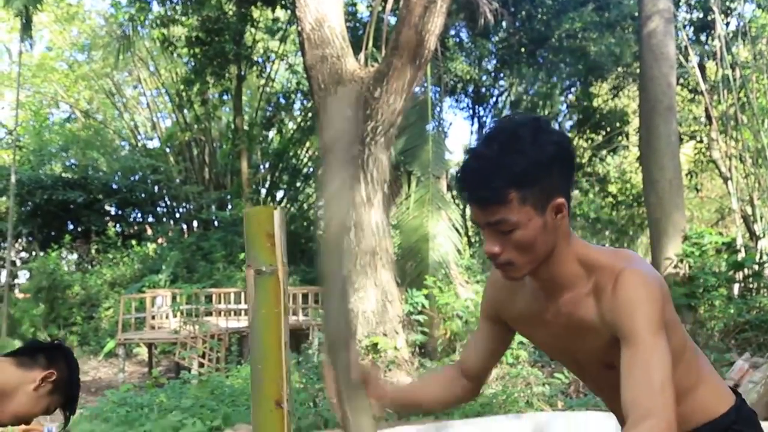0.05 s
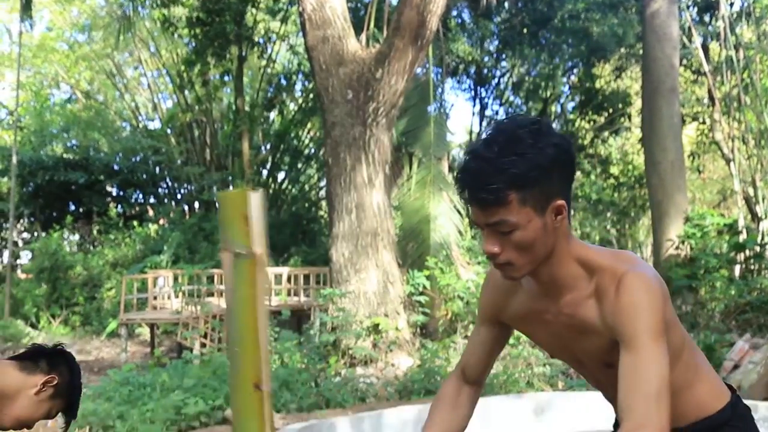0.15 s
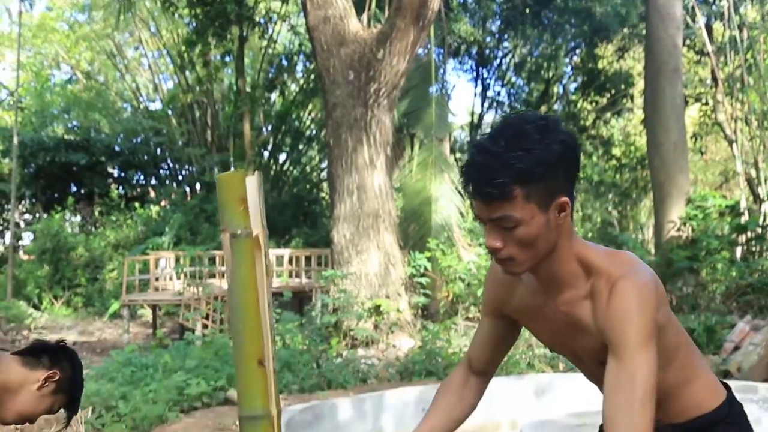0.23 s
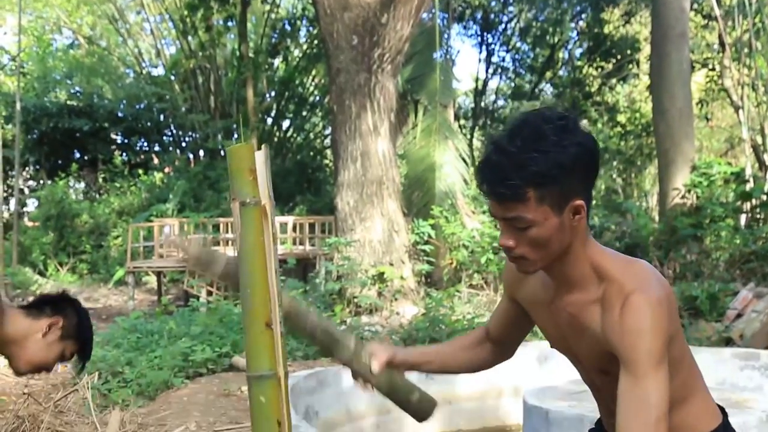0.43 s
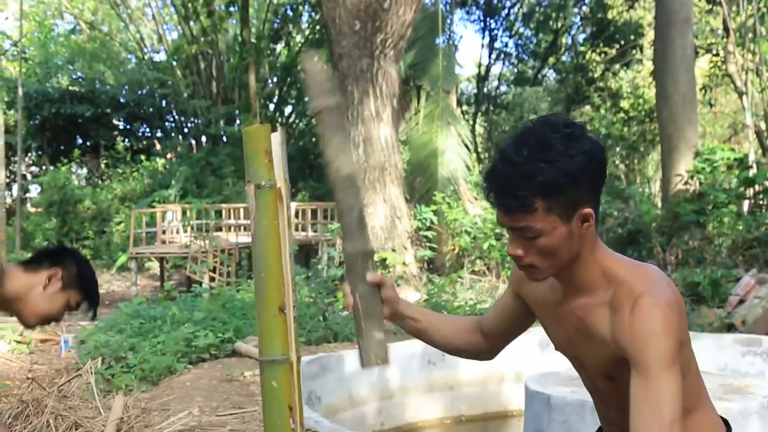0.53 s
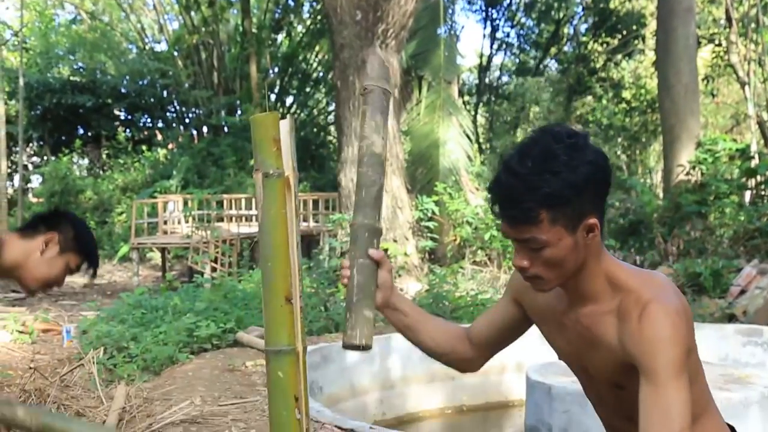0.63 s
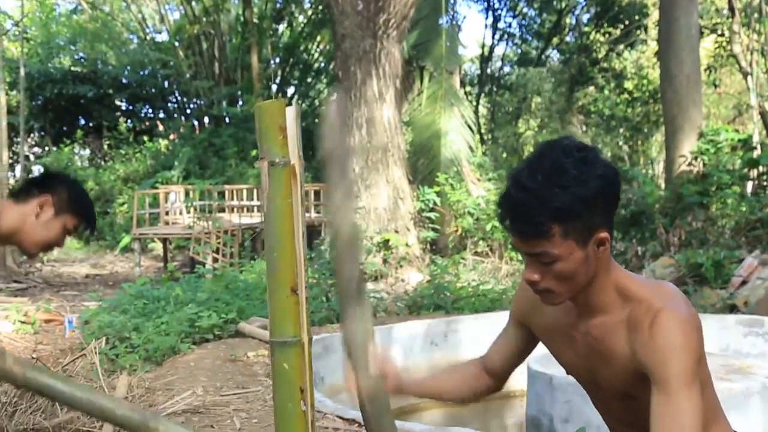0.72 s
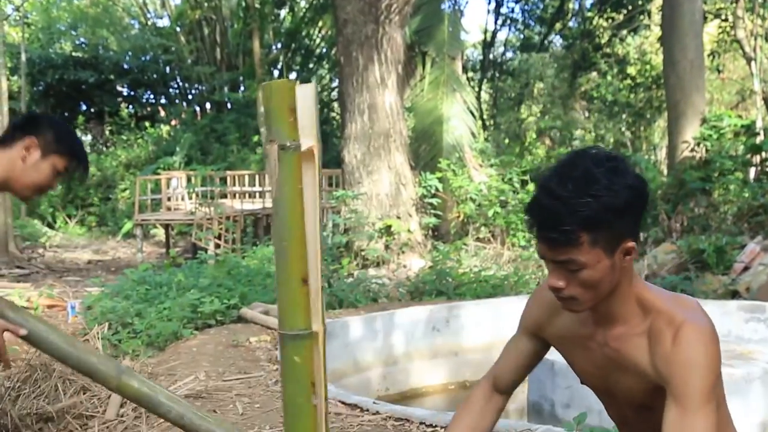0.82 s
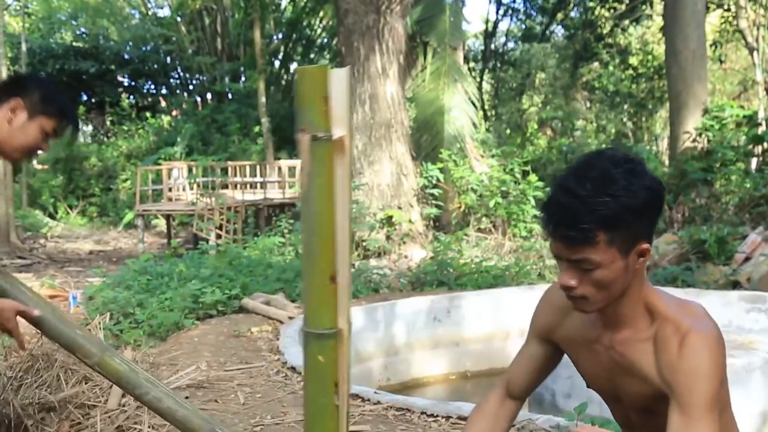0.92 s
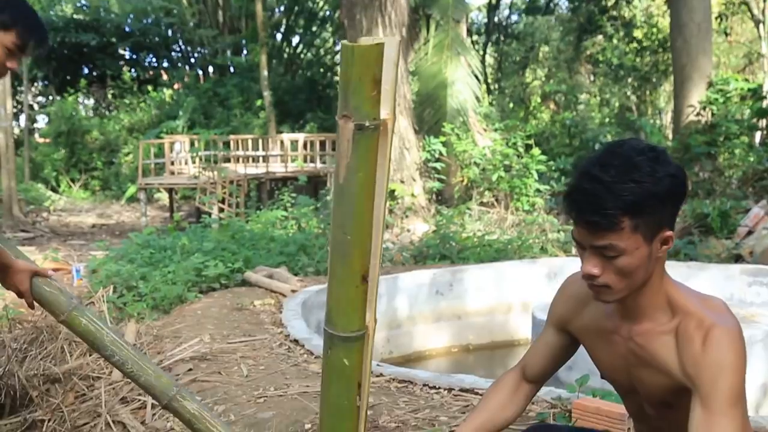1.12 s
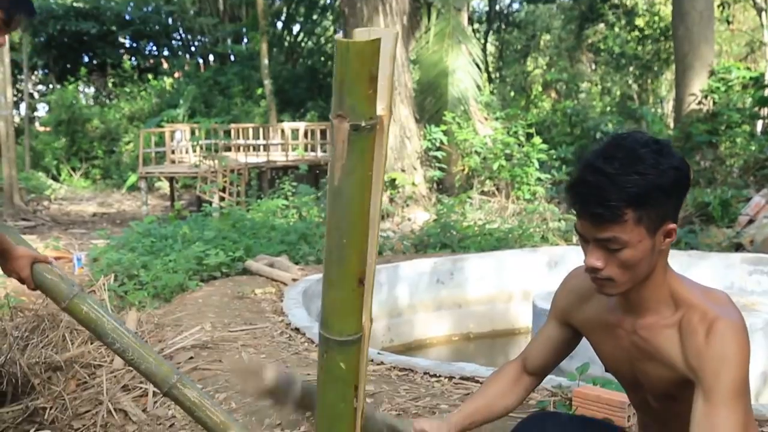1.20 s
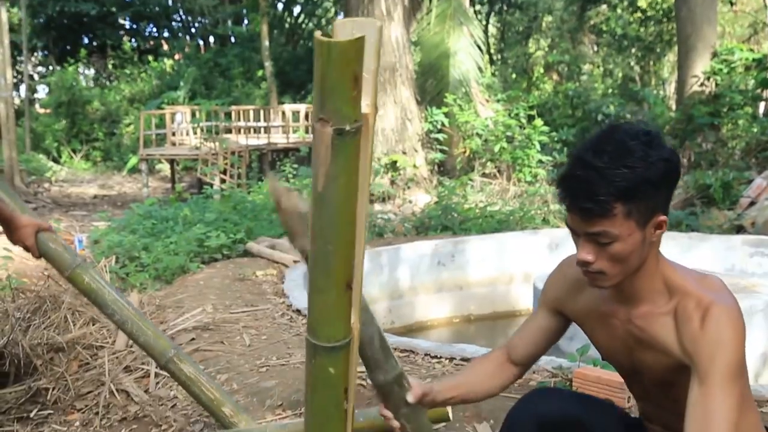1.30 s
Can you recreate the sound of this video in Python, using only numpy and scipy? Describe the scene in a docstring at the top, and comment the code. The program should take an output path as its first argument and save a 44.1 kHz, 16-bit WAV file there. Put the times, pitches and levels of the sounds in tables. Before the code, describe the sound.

Two sharp, hollow whacks of wood on bamboo outdoors, over a low distant drone.

```python
"""A grove, the microphone close to an upright, half-split bamboo pole, a low drone in the distance.
The split creaks as a wedged wooden stick slips in it. A whack rings the pole and its halves clap together.
After some light knocks and dry ticks a second stick strikes, and the halves clap again.
Each blow overloads the recorder, whose gain control ducks and recovers while the trees answer."""
import sys
import numpy as np
from scipy import signal
from scipy.fft import rfft, irfft, next_fast_len
from scipy.io import wavfile
from scipy.ndimage import minimum_filter1d, map_coordinates

SR = 44100
rng = np.random.default_rng(int(sys.argv[2]) if len(sys.argv) > 2 else 0)


def transcribe(u):
    """Save the signal u as a 16-bit wav file named by the first command-line argument.

    u: samples, shape (n,) or (channels, n), limited to [-1, 1]; the rate is SR.
    q: integer samples, one column per channel.
    """
    v = np.clip(np.atleast_2d(u).T, -1, 1)
    q = np.round(v * 32767).astype(np.int16)
    wavfile.write(sys.argv[1], SR, q)


N = 59535
RING_ATTACK_S, CRACK_ATTACK_S = 0.00059, 0.00028


def stroke(contacts, modes, scatter_db=2.5):
    """Each contact rings the pole's modes and cracks its fibres, with its own level and brightness."""
    # Spectrum of the cracking fibres. Each row: frequency in Hz, relative level in dB.
    crack = [(60, -34), (200, -7.5), (500, 0), (1600, 2), (2400, -0.5), (3800, 0.5), (5500, -9),
             (9000, -11.5), (15000, -27.5)]
    out, t = np.zeros(N), clock()
    middle_hz = np.median([hz for hz, _, _ in modes])
    for start, ring_db, ring_tilt, crack_db, crack_t60, crack_tilt in contacts:
        for k, (hz, db, t60) in enumerate(modes):
            octaves_up = max(np.log2(2 * hz / middle_hz), 0)
            level_db = ring_db + db + ring_tilt * octaves_up + scatter_db * rng.standard_normal()
            ring = fade(start, RING_ATTACK_S, t60) * np.sin(2 * np.pi * hz * (t - start))
            out += (-1) ** k * amp(level_db) * ring
        colour = [(hz, db + crack_tilt * np.log2(hz / middle_hz)) for hz, db in crack]
        out += amp(crack_db) * fade(start, CRACK_ATTACK_S, crack_t60) * noise(colour)
    return out


def first_stick():
    """The first stick whacks the pole and the split halves clap together."""
    # The blow, then the claps. Each row: start in seconds, ring level in dB, ring tilt in dB per octave,
    # crack level in dB, crack t60 in seconds, crack tilt in dB per octave.
    contacts = [(.2271, 12.5, 1, 12, 0.037, 0), (.2449, -20, 5, 5, 0.053, -0.5),
                (.2575, 1, -8.5, -6.5, 0.024, -6.5), (.2742, -8, -4, -9, 0.044, 7.5)]
    # The pole's modes under this stick. Each row: frequency in Hz, relative level in dB, t60 in seconds.
    modes = [(224, -14, 0.027), (442, -8.5, .06), (494, -19.5, 0.027), (600, -10.5, 0.08),
             (893, -24, 0.056), (1002, 2, 0.048), (1398, -15, 0.068), (1556, -6.5, 0.035),
             (1668, -11.5, 0.079), (1840, -7, 0.047), (2320, -35, 0.034), (3170, 0, 0.023),
             (3437, -7.5, 0.047), (3890, -6.5, 0.045), (4205, -15.5, 0.038)]
    return stroke(contacts, modes)


def second_stick():
    """The second stick draws a different ring from the same pole."""
    # A faint touch, the blow and two claps, then the modes they ring. Columns as for the first stick.
    contacts = [(.8655, -21.5, -4.5, -24, 0.099, -2.6), (.8812, 10.5, 0.5, 9, 0.033, 0.53),
                (.9052, 0, -1, -8.5, 0.022, -1), (.927, -3.5, -0.5, -4, 0.015, 1)]
    modes = [(208, -16.5, 0.027), (317, -18, 0.08), (600, -7.5, 0.044), (803, -8, 0.091), (905, 2.5, 0.036),
             (1027, -3.5, 0.051), (1109, -8.5, 0.088), (1316, -1, 0.045), (1557, -8, 0.035),
             (1946, -5.5, 0.033), (2500, -19, 0.045), (3266, -15, .04), (3813, -27, 0.034),
             (4173, -12, 0.061)]
    return stroke(contacts, modes)


def creak(count=80, slips_per_s=116, gap_scatter=0.2, spread_db=1.5):
    """The wedged stick slips unevenly in the split; each slip rings the tube and rasps the fibres."""
    # Course of the creak. Each row: time in seconds, relative level in dB.
    contour = [(0, -36.5), (.04, -35), (.1, -34.5), (.135, -36), (.165, -43.5), (0.176, -30.5), (.195, -32),
               (0.227, -29), (.235, -67)]
    # Resonances of the tube. Each row: centre in Hz, width in Hz, relative level in dB.
    resonances = [(954, 26, -1.5), (1398, 34, 11), (1482, 43, 5), (1874, 50, 0), (2320, 200, -3.5),
                  (3364, 30, 3), (4020, 440, -13)]
    # Spectrum of the rasp. Each row: frequency in Hz, relative level in dB.
    fibre = [(100, -7.5), (450, 3.5), (1200, 1), (2500, 1), (4500, -10), (5500, -15.5), (8000, -11.5),
             (10500, -23), (12000, -26), (15000, -44)]

    def tube(hz):
        return sum(amp(db) * 1j * hz * width / (centre ** 2 - hz ** 2 + 1j * hz * width)
                   / (1 + 1j * hz / (2 * centre)) for centre, width, db in resonances)

    gaps, sizes = rng.standard_normal((2, count))
    times = np.cumsum(np.exp(gap_scatter * gaps)) / slips_per_s
    slips = np.bincount((times * SR).astype(int), amp(spread_db * sizes), N)[:N]
    body = filtered(slips, tube)
    rasp = signal.fftconvolve(slips, fade(0, CRACK_ATTACK_S, t60=0.05))[:N] * noise(fibre)
    level = amp(np.interp(clock(), *np.transpose(contour), right=-120))
    slipping_share = times[-1] * SR / N
    return amp(-1.5) * level * np.sqrt(slipping_share) * (unit(body) + unit(rasp))


def taps(rows, attack_s=0.0014):
    """Small dead contacts: a short burst of noise in one band each."""
    out = np.zeros(N)
    for start, db, centre, octaves, t60 in rows:
        band = lambda hz: 1 / (1 + (np.log2((hz + 1) / centre) / octaves) ** 2) ** 1.44
        out += amp(db) * fade(start, attack_s, t60) * unit(filtered(rng.standard_normal(N), band))
    return out * amp(6.5)


def knocks_and_ticks():
    """The sticks knock lightly as they are handled; fibre and leaf give dry ticks."""
    # Each row: start in seconds, relative level in dB, centre in Hz, width in octaves, t60 in seconds.
    knocks = [(.479, -28.5, 1250, 0.66, 0.094), (.484, -37.5, 454, 1, 0.17),
              (.549, -40.5, 322, 0.29, 0.086), (.8455, -33, 1490, 0.18, 0.11),
              (1.016, -21.5, 1140, 0.38, 0.065), (1.03, -34, 484, 0.13, 0.16),
              (1.2175, -32, 880, 0.83, 0.037)]
    ticks = [(.6255, -31, 5330, 0.48, 0.02), (.67, -46.5, 5260, 0.72, 0.043),
             (.752, -46.5, 6000, 1.2, 0.06), (.823, -31.5, 2400, 1.25, 0.047),
             (1.255, -46, 8500, 0.59, 0.013)]
    return taps(knocks) + taps(ticks)


def grove(x, build_s=0.084):
    """The ground nearby scatters the sound; trunks and leaves return it as a diffuse, coloured wash."""
    # Decay among the trees. Each row: frequency in Hz, t60 in seconds.
    decay_times = [(200, .5), (1000, 0.3831), (3500, 0.44), (7000, 0.49), (13000, 0.27)]
    # Colour of the wash. Each row: frequency in Hz, relative level in dB.
    colour = [(100, -18), (450, -7.5), (620, -4), (780, -4), (980, 6.5), (1200, -3.5), (1450, 0.5),
              (1900, -3.5), (2500, -3), (3150, 1.5), (4200, -2.5), (5400, -13), (7200, -14), (10500, -18),
              (15000, -22)]
    hz, t, spectra = signal.stft(x, SR, nperseg=256)
    t60 = along(decay_times, hz)[:, None]
    tail = (np.exp(-np.log(1000) * t / t60) * (1 - np.exp(-t / build_s))) ** 2
    energy = np.sum(np.abs(spectra) ** 2, axis=0)[None]
    power = signal.fftconvolve(energy, tail / tail.sum(axis=1, keepdims=True), axes=1)[:, :len(t)]
    wash_spectra = signal.stft(noise(colour), SR, nperseg=256)[2] * np.sqrt(np.abs(power))
    wash = signal.istft(wash_spectra, SR, nperseg=256)[1][:N]
    ground = rng.standard_normal(N) * fade(0, attack=0.0055, t60=0.22)
    scatter = signal.fftconvolve(x, ground / np.linalg.norm(ground))[:N]
    return amp(-15) * wash + amp(-22) * scatter


def background(drone_hz=148.8, wander_hz=2.9, drone_sway_db=2, air_sway_db=0.5):
    """Leafy air, low rumble and a wavering drone like a far engine."""
    # Spectra of the air and the rumble. Each row: frequency in Hz, relative level in dB.
    air = [(100, -4), (300, 2), (450, -3), (750, 3.5), (950, 7.5), (1150, 2.5), (1400, 4), (2000, -3),
           (3400, 2), (4400, -3.5), (5500, -13.5), (9500, -16.5), (13000, -23.5), (15500, -25)]
    rumble = [(20, -30), (45, -19), (75, -9.5), (115, -5), (160, -3.5), (210, -14), (320, -14.5),
              (700, -93)]
    pitch = drone_hz + wander_hz * wobble(24.2)
    drone = unit(amp(drone_sway_db * wobble(37)) * np.sin(2 * np.pi * np.cumsum(pitch) / SR))
    air_level = amp(-41 + air_sway_db * wobble(10.67))
    return air_level * noise(air) + amp(-44.5) * noise(rumble) + amp(-45.5) * drone


def amp(db):
    """Decibels to gain."""
    return 10 ** (np.asarray(db) / 20)


def unit(x):
    """Scale to rms 1."""
    return x / np.sqrt(np.mean(x ** 2) + 1e-20)


def along(points, hz):
    """Interpolate (Hz, value) points on a log frequency axis."""
    knots_hz, values = np.transpose(points)
    return np.interp(np.log(hz + 1), np.log(knots_hz + 1), values)


def clock():
    """Seconds at each sample."""
    return np.arange(N) / SR


def wobble(rate):
    """A smooth random curve, rate knots a second."""
    return map_coordinates(rng.standard_normal(int(N * rate / SR) + 4), [clock() * rate])


def filtered(x, response):
    """Filter x by a response given as a function of Hz."""
    size = next_fast_len(N + SR // 2)
    return irfft(rfft(x, size) * response(np.fft.rfftfreq(size, 1 / SR)), size)[:N]


def noise(spectrum):
    """Noise of rms 1, coloured by (Hz, dB) points."""
    return unit(filtered(rng.standard_normal(N), lambda hz: amp(along(spectrum, hz))))


def fade(start, attack, t60):
    """Quick rise at start, then a decay of 60 dB every t60 seconds."""
    t = np.maximum(clock() - start, 0)
    return (1 - np.exp(-t / attack)) * np.exp(-np.log(1000) * t / t60)


def scene():
    """Both strokes and the small sounds close by, the grove and its background behind them."""
    first = first_stick() + creak()
    second = second_stick() + knocks_and_ticks()
    return (first + grove(first) + second + grove(second) + background())[None]


def record(dry, duck_share=0.74, attack_s=0.0064, hold_s=0.11, release_db_per_s=89.5):
    """The microphone softens the top; the gain control ducks too late for the blows, so they clip."""
    mic_edge_hz, low_cut_hz, top_hz = 12400, 25, 15700
    mic = signal.sosfilt(signal.butter(4, mic_edge_hz, fs=SR, output="sos"), dry[0])
    need_db = duck_share * np.maximum(20 * np.log10(np.abs(mic) + 1e-9), 0)  # acts above full scale
    half_hold = int(hold_s * SR / 2)
    held_db = -minimum_filter1d(-need_db, 2 * half_hold + 1, origin=half_hold, mode="constant")
    release_db = release_db_per_s * clock()
    target_db = np.maximum.accumulate(held_db + release_db) - release_db
    lag = np.exp(-1 / (attack_s * SR))
    duck_db = signal.lfilter([1 - lag], [1, -lag], target_db)
    clipped = np.clip(mic * amp(-duck_db), -0.99, 0.99)
    low_cut = signal.sosfilt(signal.butter(1, low_cut_hz, "highpass", fs=SR, output="sos"), clipped)
    return filtered(low_cut, lambda hz: 1 / np.sqrt(1 + (hz / top_hz) ** 80))[None]  # steep treble cut


dry = scene()
out = record(dry)
transcribe(out)
```